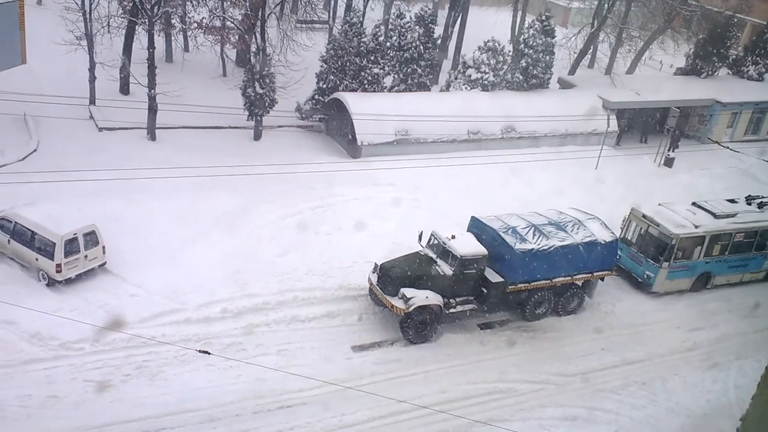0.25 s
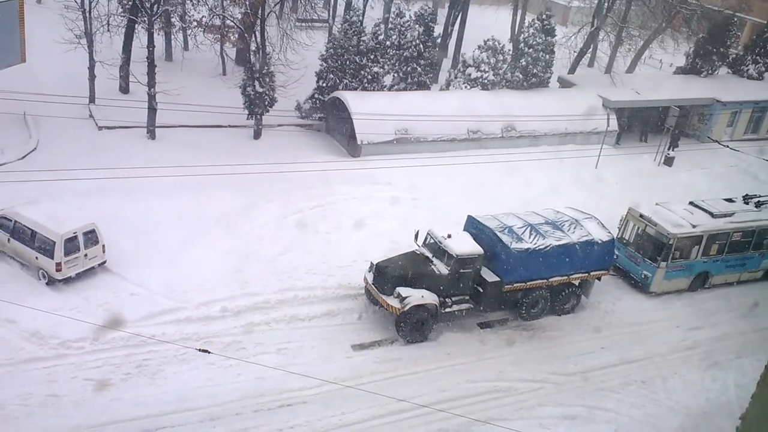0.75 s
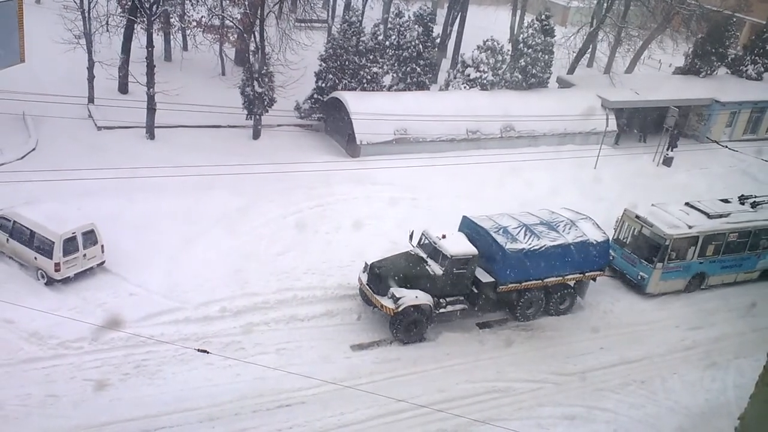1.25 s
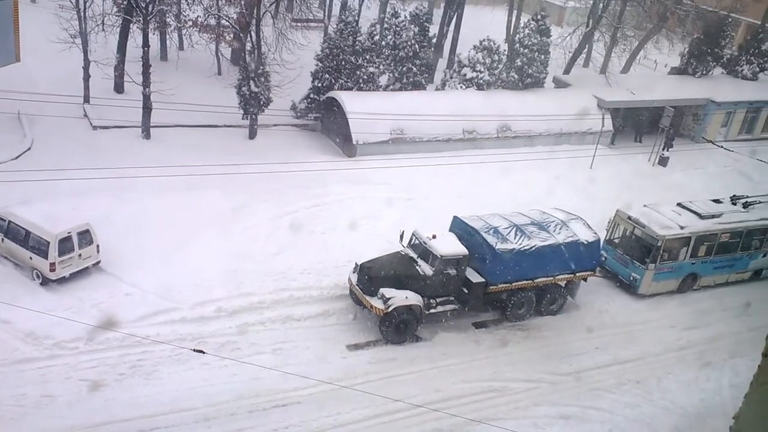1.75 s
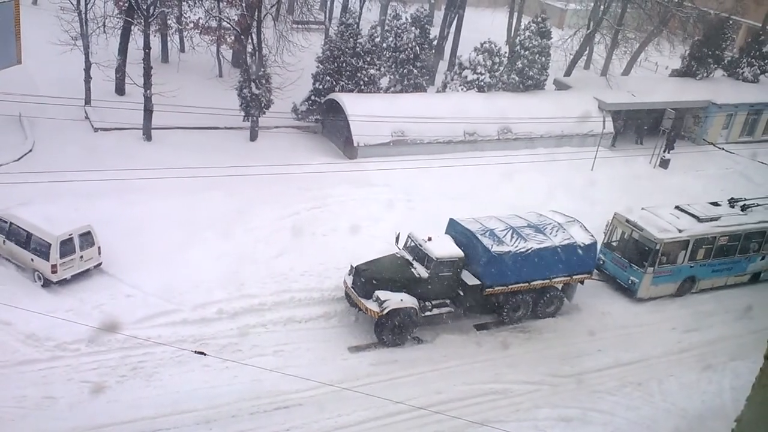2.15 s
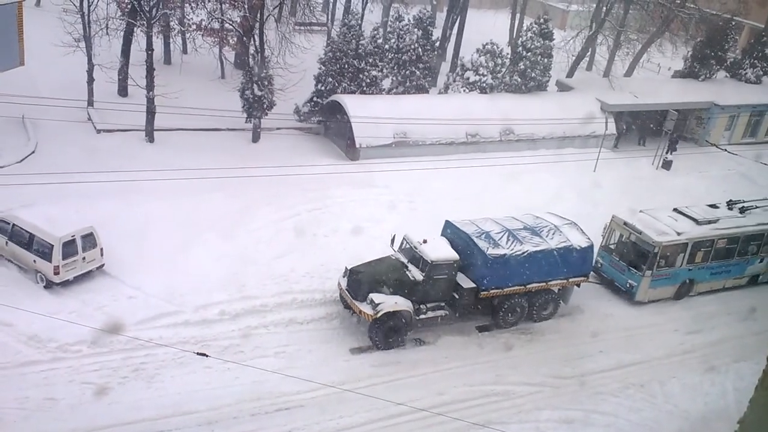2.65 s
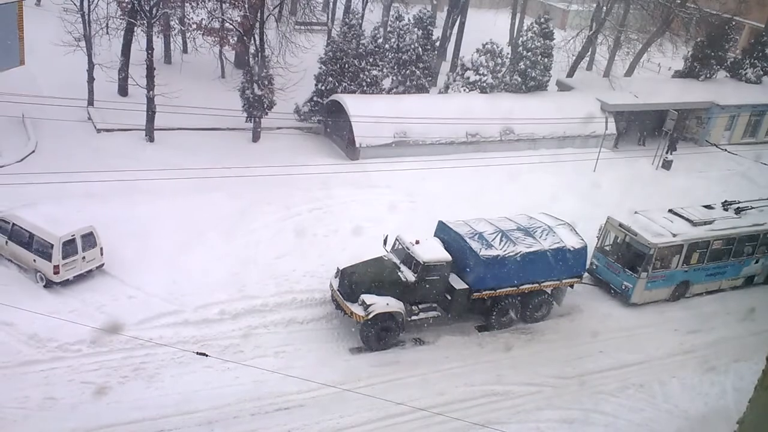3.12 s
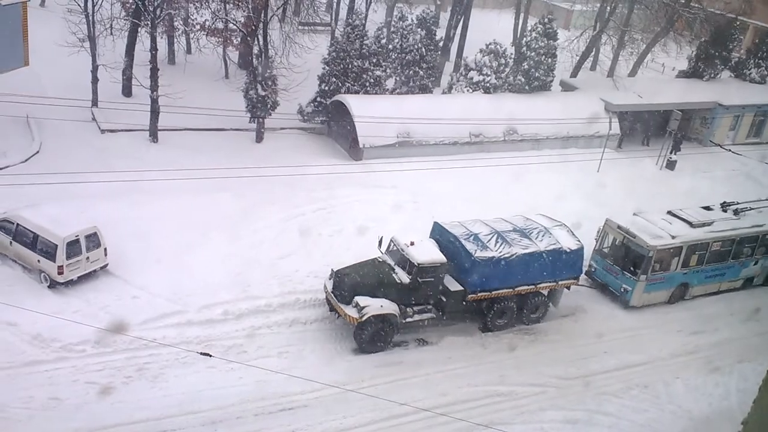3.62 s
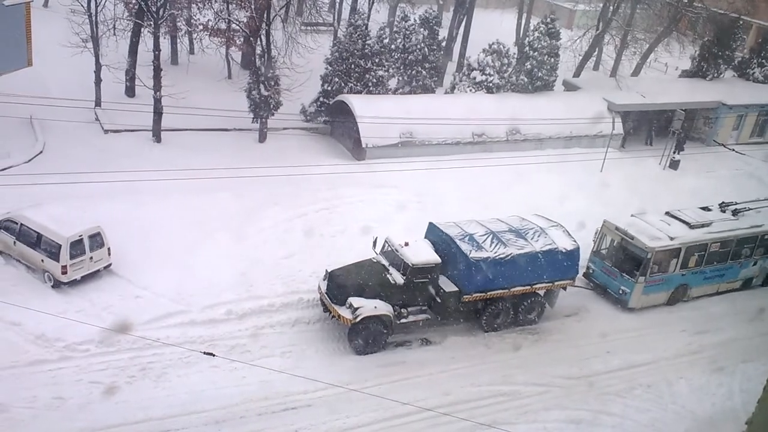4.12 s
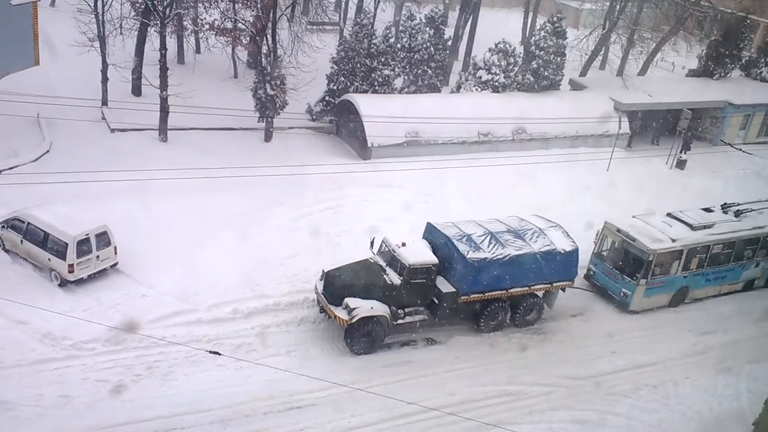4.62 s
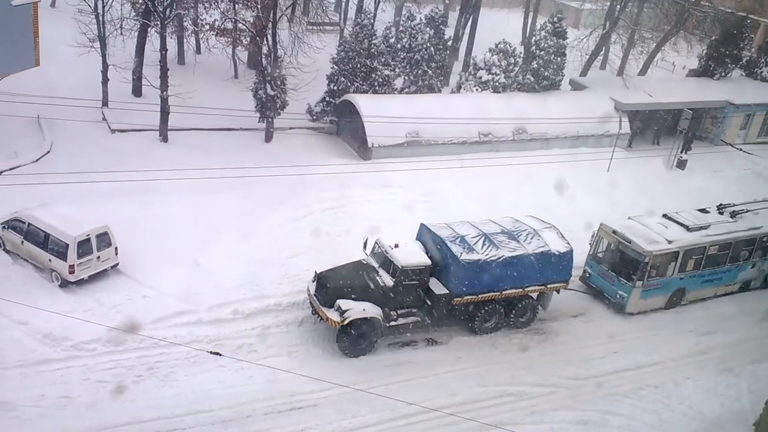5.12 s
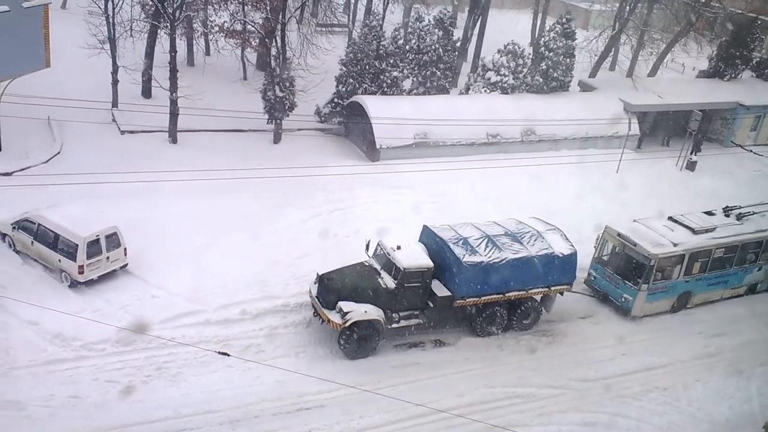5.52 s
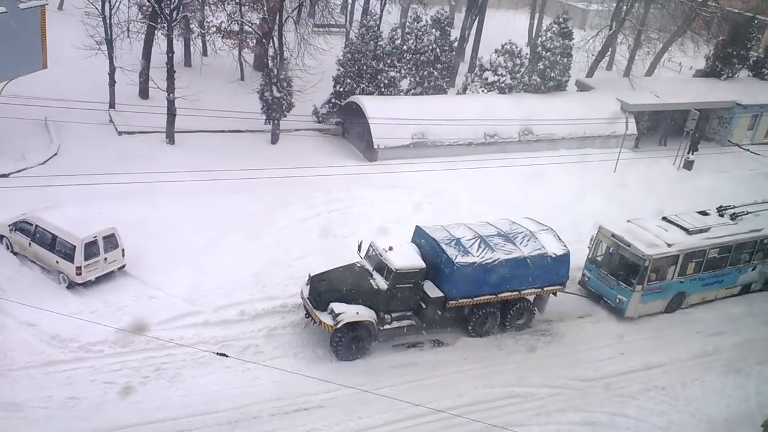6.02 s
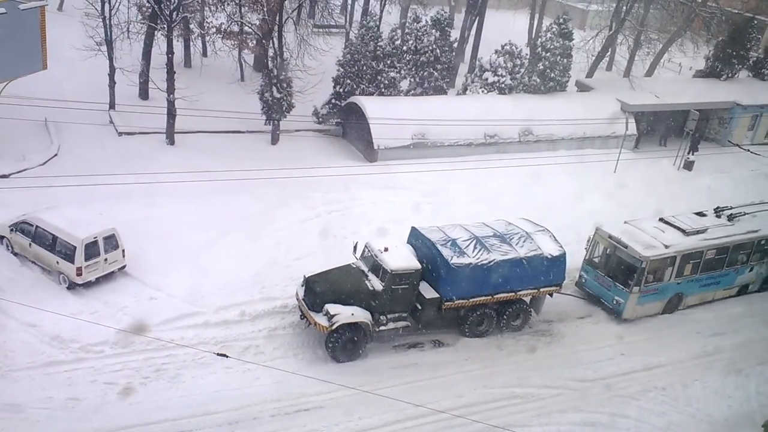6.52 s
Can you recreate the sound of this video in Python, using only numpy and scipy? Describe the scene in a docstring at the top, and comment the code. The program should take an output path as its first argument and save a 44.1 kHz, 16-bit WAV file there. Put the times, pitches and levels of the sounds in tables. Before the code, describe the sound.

Heard from a window above a snowy street, a big diesel engine rumbles steadily, then labours harder and rises slightly in pitch.

```python
"""A second vehicle booms briefly, then drones on until it fades after 2.7 s: a swept tone and its octave.
With it throbs a heavy V8 diesel truck towing a bus through snow, heard from a window above the street.
One engine cycle drives its harmonic exhaust and the ringing knock of its block; load builds from 2 s.
Narrow bands of noise make steady whines and a thin whistle, over coloured noise for the town's rumble
and hiss; short wavering sine tones swell out of the labouring truck from about 2.6 s."""
import sys
import numpy as np
from scipy import signal
from scipy.fft import rfft, irfft
from scipy.io import wavfile

SR = 44100
rng = np.random.default_rng(int(sys.argv[2]) if len(sys.argv) > 2 else 0)


def waveform_to_disk(signal):
    """Save audio, clipped to [-1, 1], as 16-bit WAV at the path in sys.argv[1]."""
    frames = np.transpose(np.atleast_2d(signal))
    scaled = np.clip(frames, -1, 1) * 32767
    samples = np.round(scaled).astype(np.int16)
    wavfile.write(sys.argv[1], SR, samples)


N = 298116
T = np.arange(N) / SR  # time [s]
HZ = np.fft.rfftfreq(N, 1 / SR)  # frequency of each spectral bin [Hz]


def amp(db):
    """Logarithmic level: decibels become an amplitude gain."""
    return 10 ** (np.asarray(db) / 20)


def unit(x):
    """Normalization: scales a signal to rms 1."""
    return x / np.sqrt(np.mean(x ** 2) + 1e-20)


def curve(rows):
    """Linear interpolation: a (time [s], value) table, sample by sample."""
    times, values = np.transpose(rows)
    return np.interp(T, times, values)


def noise():
    """White noise: equal power at every frequency."""
    return rng.standard_normal(N)


def colour(x, points):
    """Spectral shaping: filters by (frequency [Hz], relative level [dB]) points, then sets rms 1."""
    hz, db = np.transpose(points)
    gain_db = np.interp(np.log(HZ + 1), np.log(hz), db)
    return unit(irfft(rfft(x) * amp(gain_db), N))


def narrow(hz, width_hz):
    """Narrow-band noise: a fuzzy tone of rms 1, at half amplitude width_hz from its centre."""
    band = 1 / (1 + ((HZ - hz) / width_hz) ** 2)
    return unit(irfft(rfft(noise()) * band, N))


def wander(rate_hz):
    """Random modulation: straight lines between random points, of rms 1."""
    place = 2 * rate_hz * T + rng.random()
    points = rng.standard_normal(1024)
    return unit(np.interp(place, np.arange(len(points)), points))


def swell(centre_s, length_s):
    """Amplitude envelope: one half-cosine hump of height 1."""
    return np.cos(np.pi * np.clip((T - centre_s) / length_s, -.5, .5))


BOOM_AT_S, BOOM_LENGTH_S = 0.12, .36
# Second vehicle's pace, the pitch of its fundamental: (time [s], exhaust pulse rate [Hz])
OTHER_PACE = [(0, 47), (.1, 50.3), (.25, 49.5), (.5, 54.1), (1, 55.8), (1.9, 53.2), (3.3, 58)]


def other_vehicle():
    """Periodic pulsation: an exhaust fundamental and octave boom, then drone; a puff of gas dies away."""
    drone_db, drone_octave_db = -52, -42.5
    leaves_s, fade_s, fade_db = 2.7, 0.41, -20
    boom_db, boom_octave_db = -26, -28
    puff_db, puff_db_per_s = -64, -43.5
    near = amp(fade_db * np.clip((T - leaves_s) / fade_s, 0, 1))
    boom = swell(BOOM_AT_S, BOOM_LENGTH_S)
    first = amp(drone_db) * near + amp(boom_db) * boom
    second = amp(drone_octave_db) * near + amp(boom_octave_db) * boom ** 4
    phase = 2 * np.pi * np.cumsum(curve(OTHER_PACE)) / SR
    note = first * np.sin(phase) - second * np.sin(2 * phase)
    note *= 1 + .1 * wander(8)
    hiss = colour(noise(), [(500, -21), (1800, 6.5), (3400, 4.5), (6000, -8.5), (9000, -12.5), (15000, -23)])
    return np.sqrt(2) * note + amp(puff_db + puff_db_per_s * T) * hiss


# Engine speed, as the pitch of the exhaust's main note: (time [s], frequency [Hz])
NOTE_PITCH = [(0, 72.5), (.5, 68.3), (1, 69.5), (2.5, 68.9), (2.85, 70.9), (3.8, 73.4), (4.25, 72.6),
              (5.4, 73.9), (6.3, 77), (6.76, 82.1)]


def note_pitch():
    """Pitch follows speed: the main exhaust note [Hz] rises and falls with the crankshaft."""
    return curve(NOTE_PITCH)


def effort(level):
    """Source strength follows load, and the note's rise above its cruising pitch, each by its own dB term,
    which may be negative."""
    load_start_s, cruise_hz = 2.02, 72.3
    light_db, load_db, rise_s, db_per_hz = level
    load = np.sin(np.pi / 2 * np.clip((T - load_start_s) / rise_s, 0, 1)) ** 2
    revs_hz = np.maximum(note_pitch() - cruise_hz, 0)
    return amp(light_db + load_db * load + db_per_hz * revs_hz)


# Resonance of the room behind the window: (frequency [Hz], width [Hz], level of the added boom [dB])
ROOM_BOOM = (100.5, 7, 5)


def orders(table, cycle, cycle_hz, flutter, drift):
    """Harmonic series: street echoes sway each line's level and phase; the room's resonance swells it."""
    boom_hz, width_hz, boom_db = ROOM_BOOM
    out = np.zeros(N)
    for multiple, db in table:
        detuning = 2 * (multiple * cycle_hz - boom_hz) / width_hz
        boom = 1 + amp(boom_db) / (1 + detuning ** 2)
        level = amp(db) * boom * (1 + flutter * wander(2))
        out += level * np.cos(2 * np.pi * multiple * cycle + drift * wander(0.99))
    return np.sqrt(2) * out


def firings(cycle, uneven_db, decay):
    """Impulsive excitation: eight decaying blows a cycle, unequal by cylinder; decay in firing gaps."""
    strength = amp(uneven_db * rng.standard_normal(8))
    place = (cycle % 1) * len(strength)
    cylinder = place.astype(int) % len(strength)
    return strength[cylinder] * np.exp(-(place % 1) / decay)


# Rasp of the exhaust pipe under load: (frequency [Hz], relative level [dB])
RASP_COLOUR = [(125, -24.5), (160, -14), (180, -8), (240, 6.5), (310, -8.5), (370, -4.5), (520, -6),
               (580, -13.5), (820, 0), (1250, -12.5), (1650, -9), (2100, -33.5), (8000, -62.5)]


def rasp(cycle):
    """Periodicity: unequal cylinders give a dense comb of cycle harmonics, blurred by uneven firing."""
    grid = np.linspace(0, 1, 4096, endpoint=False)
    flat = irfft(np.exp(2j * np.pi * rng.random(len(grid) // 2 + 1)))  # flat spectrum, random phases
    one_cycle = flat * (2 + firings(grid, uneven_db=2, decay=.5))
    uneven_cycle = cycle + .001 * wander(3)
    train = np.interp(uneven_cycle, grid, one_cycle, period=1)
    return colour(train * (1 + .15 * wander(15)), RASP_COLOUR)


# Exhaust lines, deep, middle and high: (multiple of the four-stroke cycle rate, relative level [dB])
DEEP_LINES = [(4, -27), (5, -22), (6, -11), (7, -20), (8, -25), (10, -.5), (11, -22)]
OVERTONE_LINES = [(12, -3), (13, -5), (14, -5), (15, -10), (16, -8), (17, -14), (19, -10), (20, -6.5),
                  (21, -9), (22, -10)]
GROWL_LINES = [(26, -12), (32, -11), (40, -9), (48, -9), (49, -9), (52, -10), (64, -9), (72, -11)]  # mostly harmonics of the eight firings a cycle
# Layer gains: (light running [dB], added at full load [dB], rise time [s], slope above cruise [dB/Hz])
NOTE_LEVEL = (-46.5, 12.5, 2.5, -0.05)
OVERTONE_LEVEL = (-51, 6, 0.9, 0.63)
GROWL_LEVEL = (-57.5, 6.5, 2.5, 1.0)


def exhaust(cycle, cycle_hz):
    """Superposition: a steady deep note, overtones beating loosely once a cycle, a growl under load."""
    note = orders(DEEP_LINES, cycle, cycle_hz, flutter=.1, drift=.1)
    overtones = orders(OVERTONE_LINES, cycle, cycle_hz, flutter=.25, drift=1.1)
    growl = orders(GROWL_LINES, cycle, cycle_hz, flutter=.4, drift=1.5) + rasp(cycle)
    return effort(NOTE_LEVEL) * note + effort(OVERTONE_LEVEL) * overtones + effort(GROWL_LEVEL) * growl


def ring(x, modes):
    """Modal resonance: a signal excites damped modes, which add up."""
    response = 0
    for hz, width_hz, db in modes:
        damping = 1j * HZ * width_hz
        response = response + amp(db) * damping / (hz ** 2 - HZ ** 2 + damping)
    return irfft(rfft(x) * response, N)


# Ringing modes of block and panels: (frequency [Hz], width [Hz], relative level [dB])
BLOCK_MODES = [(350.4, 10, -9.5), (453.4, 35, 2.5), (527, 31, 2), (592, 47, -8.5), (658.3, 38, 1),
               (762, 50, 1.5), (885.3, 15, 2), (970, 10, -6), (1054, 17, -2.5), (1107, 7.2, 0),
               (1434, 15, -12), (1413, 17, -7.5)]
# Broad colour of the rattle: (frequency [Hz], relative level [dB])
RATTLE_COLOUR = [(120, 28), (200, -11), (380, -3.5), (700, 19.5), (930, 6), (1250, -14), (1650, -13),
                 (1900, -29), (2700, -49.5), (4000, -40), (9000, -55.5)]
# Clatter gain: (light running [dB], added at full load [dB], rise time [s], slope above cruise [dB/Hz])
CLATTER_LEVEL = (-42, -0.6, 0.9, 0.58)


def clatter(cycle, modes_db=-5.5, broad_db=-7.5):
    """Forced vibration: combustion knocks ring and rattle the block; street echoes fill the gaps."""
    echo_fill = .6
    knocks = noise() * (echo_fill + firings(cycle, uneven_db=2.5, decay=.4))
    rattle = noise() * (echo_fill + firings(cycle, uneven_db=2.5, decay=.4))
    ring_colour = [(150, -14.5), (320, 11.5), (1150, 11.0), (1800, 4.0), (3000, -19.5), (7000, -45.0)]
    rung = colour(ring(knocks, BLOCK_MODES), ring_colour)
    return effort(CLATTER_LEVEL) * (amp(modes_db) * rung + amp(broad_db) * colour(rattle, RATTLE_COLOUR))


# Steady thin whines: (frequency [Hz], width [Hz], relative level [dB])
WHINES = [(343, 12, -58), (602, 8, -59.5), (874, 22, -56), (946, 8, -61.5), (1465, 16, -73.5),
          (1980, 18, -79.5), (2222, 22, -83.5), (2440, 40, -83), (2970, 30, -92), (3500, 60, -88.5)]


def whines(level_db=2):
    """Narrow-band radiation: thin tones sound at steady levels."""
    return amp(level_db) * sum(amp(db) * narrow(hz, width_hz) for hz, width_hz, db in WHINES)


def whistle(centre_hz=5020, width_hz=40, base_db=-81, boom_db=5.5):
    """Modulated narrow-band air noise: it flutters, strengthens in the boom and has one lull."""
    lull_at_s, lull_length_s, lull_db = 3.68, .6, -8
    flutter_db = 1.6 * wander(10)
    boom_rise_db = boom_db * swell(BOOM_AT_S, BOOM_LENGTH_S)
    lull_dip_db = lull_db * swell(lull_at_s, lull_length_s)
    return amp(base_db + boom_rise_db + lull_dip_db + flutter_db) * narrow(centre_hz, width_hz)


# Low rumble of the town, and faint hiss of the air: (frequency [Hz], relative level [dB])
RUMBLE_COLOUR = [(15, -34), (22, -17), (27, -6), (33, -12), (41, 1), (52, 0), (62, -7), (80, -7), (98, 2),
                 (125, -9), (145, -5), (200, -17), (400, -22), (900, -40), (3000, -90)]
HISS_COLOUR = [(300, 0), (2000, -2), (3400, -3.5), (4200, -8.5), (5500, -9), (7500, -16), (10500, -21.5),
               (15500, -21.5)]


def street(rumble_db=-41.0, hiss_db=-70.0):
    """Diffuse background: coloured noise makes a steady rumble and a faintly flickering hiss."""
    flicker_db = .6 * wander(8)
    rumble = amp(rumble_db) * colour(noise(), RUMBLE_COLOUR)
    return rumble + amp(hiss_db + flicker_db) * colour(noise(), HISS_COLOUR)


# Brief drones of the labouring truck: (centre [s], length [s], frequency [Hz], rms level at the peak [dB])
DRONES = [(2.812, 0.41, 247, -49.5), (3.96, 0.7, 466.5, -55), (4.355, 0.58, 191.7, -48.5),
          (5.24, 0.25, 521, -48), (5.5, 0.38, 238, -49.5), (5.718, 0.19, 447, -43.5),
          (5.996, .28, 234.6, -43), (6.53, 0.35, 523.4, -45.5)]


def drones():
    """Phase modulation: short wavering sine tones swell and fade."""
    out = np.zeros(N)
    for centre_s, length_s, hz, db in DRONES:
        tone = np.sin(2 * np.pi * hz * T + .4 * wander(15))
        out += amp(db) * swell(centre_s, length_s) * tone
    return np.sqrt(2) * out


def scene():
    """Common excitation: one engine cycle (two crankshaft turns) drives exhaust and clatter alike."""
    cycle_hz = note_pitch() / 10  # the main note is the cycle's tenth harmonic
    cycle = np.cumsum(cycle_hz) / SR  # engine cycles so far
    truck = exhaust(cycle, cycle_hz) + clatter(cycle) + whines() + drones()
    return (other_vehicle() + truck + whistle() + street())[None]


def record(dry, edge_hz=15720):
    """Band limitation: the recorder's low-pass filter removes the highest treble."""
    lowpass = signal.firwin(511, edge_hz, window=("kaiser", 9), fs=SR)
    return signal.oaconvolve(dry, lowpass[None], "same")


dry = scene()
out = record(dry)
waveform_to_disk(out)
```